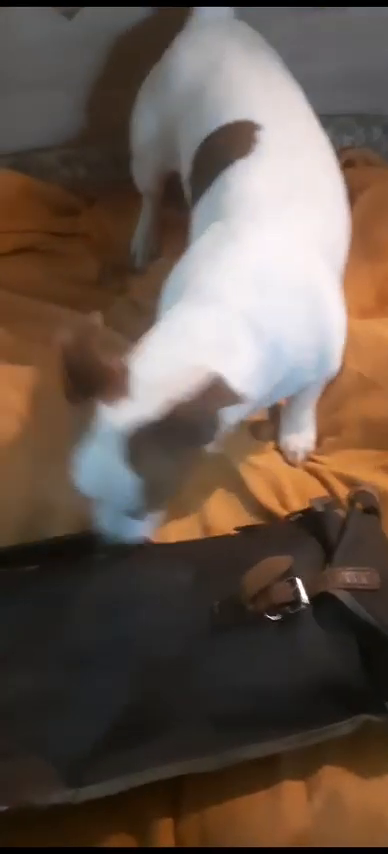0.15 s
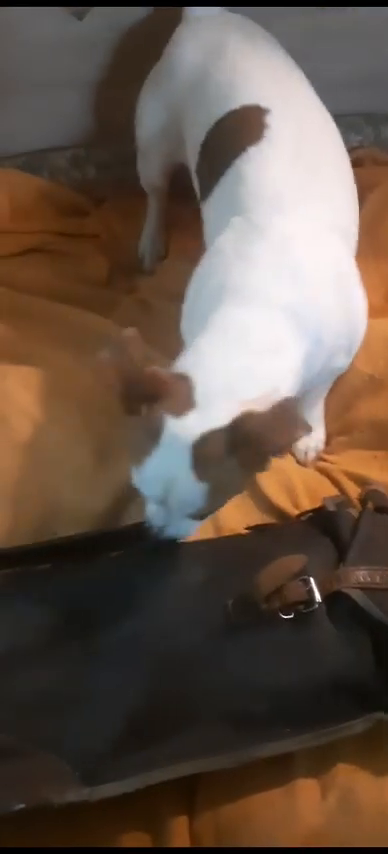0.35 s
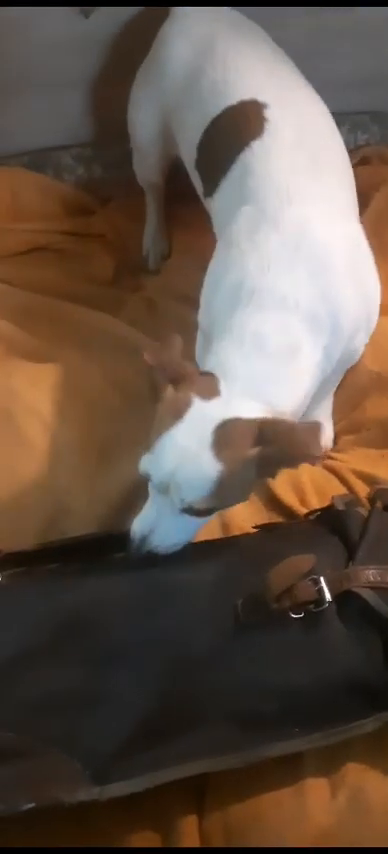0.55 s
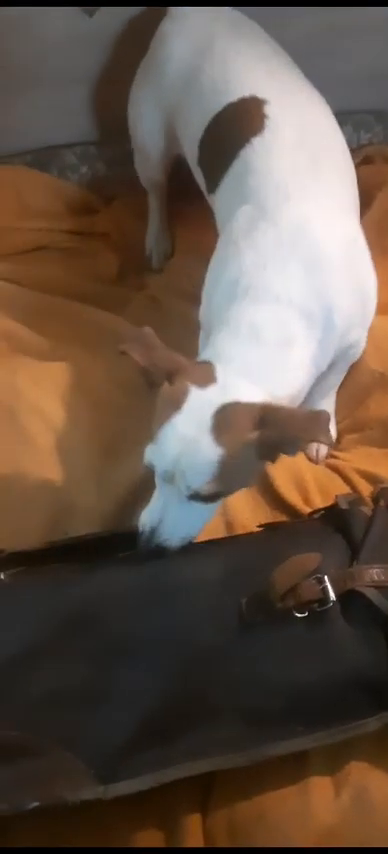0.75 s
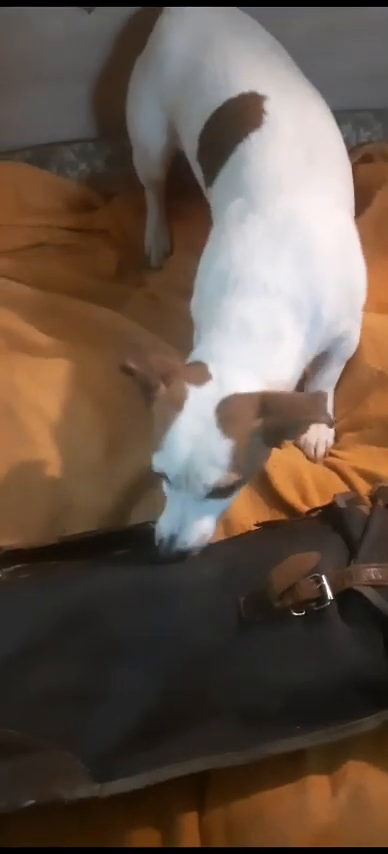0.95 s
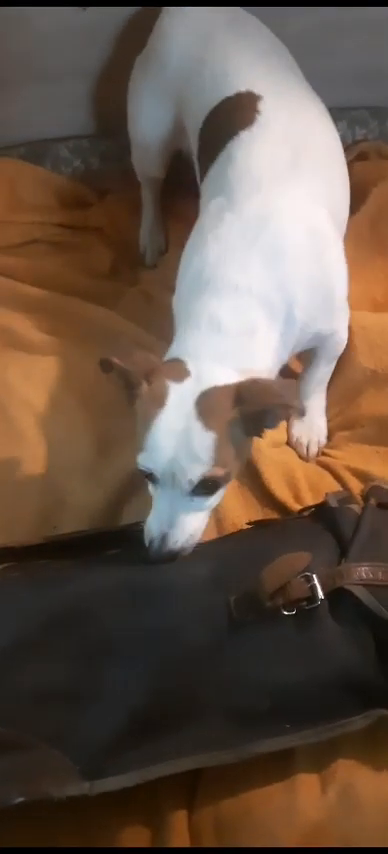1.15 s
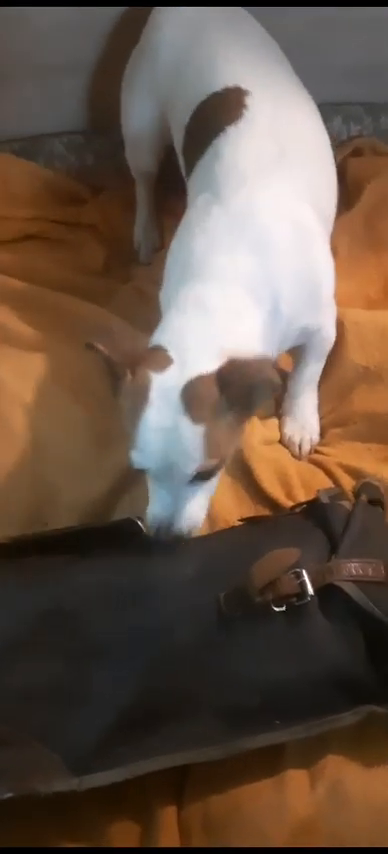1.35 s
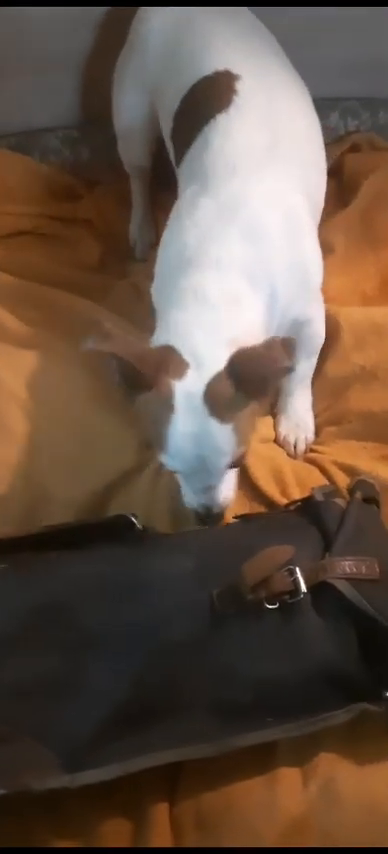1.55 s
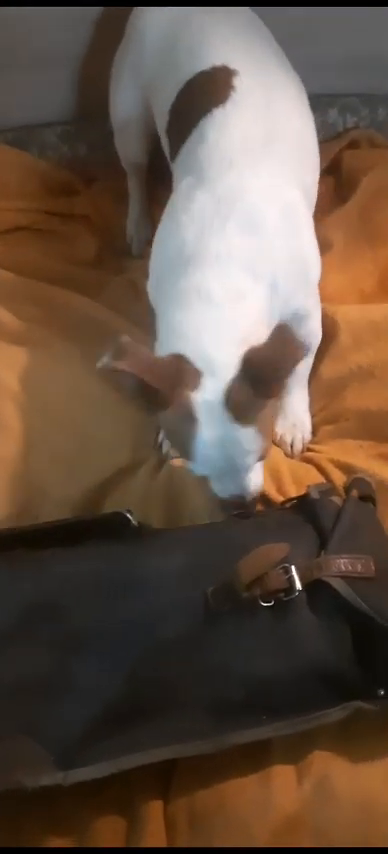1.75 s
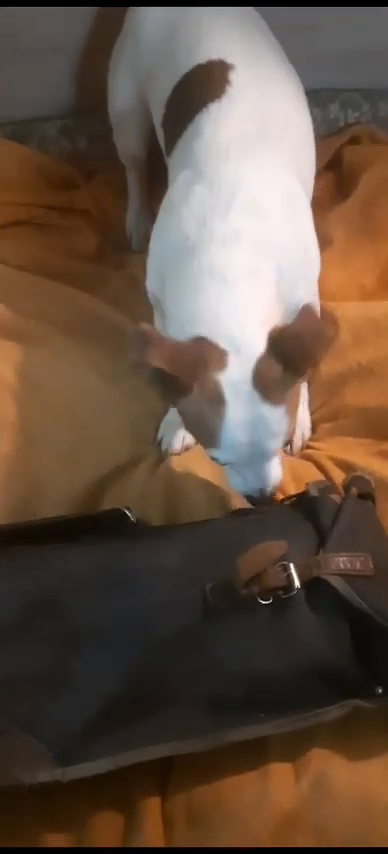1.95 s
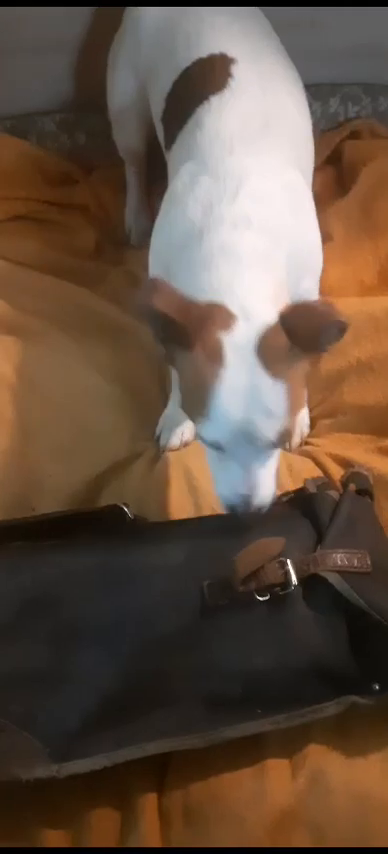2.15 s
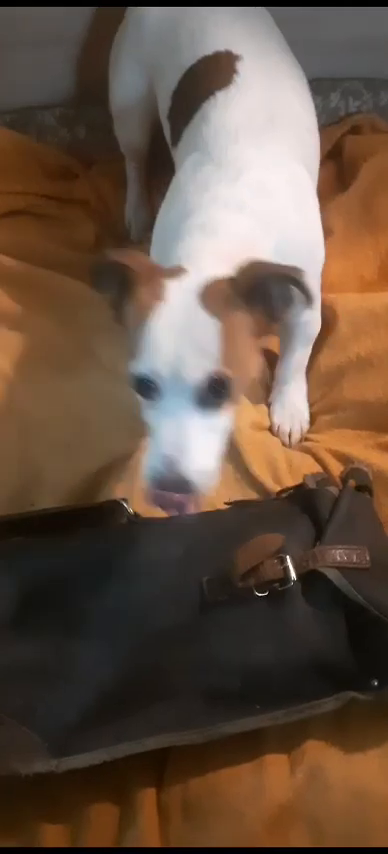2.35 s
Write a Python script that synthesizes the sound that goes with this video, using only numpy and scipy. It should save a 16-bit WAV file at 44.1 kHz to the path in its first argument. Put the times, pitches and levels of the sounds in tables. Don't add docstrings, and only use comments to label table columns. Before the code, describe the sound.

Dog whimpering close by, piercing whistle-like yips and falling whines, with breathy puffs and soft snorts

```python
import sys
import numpy as np
from scipy import signal
from scipy.fft import rfft, irfft, next_fast_len
from scipy.io import wavfile
from scipy.ndimage import uniform_filter1d, minimum_filter1d, map_coordinates

SR = 44100
rng = np.random.default_rng(int(sys.argv[2]) if len(sys.argv) > 2 else 0)


def to_wav(s):
    ch = np.atleast_2d(s).T
    pcm = np.round(np.clip(ch, -1, 1) * 32767)
    wavfile.write(sys.argv[1], SR, pcm.astype(np.int16))


def linear_from_db(decibels):
    return 10 ** (np.asarray(decibels, float) / 20)


N = 110250
T = np.arange(N) / SR
SHIMMER_DB, FLUTTER_DB = 0.5, 2.5
SMEAR_RAD = 0.08
AIR_FOLLOWS = 0.77


def unit(x):
    return x / np.sqrt(np.mean(x ** 2) + 1e-20)


def along(points, hz):
    f, v = np.transpose(points)
    return np.interp(np.log(hz + 1), np.log(f + 1), v)


def wobble(rate_hz):
    return map_coordinates(rng.standard_normal(int(N * 400 / SR) + 4), [T * rate_hz])


def filtered(x, response):
    m = next_fast_len(N + SR // 2)
    return irfft(rfft(x, m) * response(np.fft.rfftfreq(m, 1 / SR)), m)[..., :N]


def peak(f, hz, width_hz):
    return 1j * f * width_hz / (hz * hz - f * f + 1j * f * width_hz)


def track(rows):
    t_s, *cols = np.transpose(rows)
    gate = np.clip(np.minimum(T - t_s[0], t_s[-1] - T) / 0.004, 0, 1)
    return gate, [uniform_filter1d(np.interp(T, t_s, c), size=221) for c in cols]


def phase(hz):
    jitter = 0.003
    return 2 * np.pi * np.cumsum(hz * (1 + jitter * wobble(150))) / SR


def tone(angle, db, shimmer_db):
    return np.sqrt(2) * linear_from_db(db + shimmer_db * wobble(70)) * np.sin(angle)


def stack(hz, angle, db, start_db, fall_db, count, order):
    # f/Hz, gain/dB
    mouth = [(1500, -4.5), (2200, 0.5), (3200, 6), (5300, -4), (6600, -13.5), (8000, -1), (9900, -16.5),
             (11800, 1)]
    out = np.zeros(N)
    for k in range(order, count):
        smeared = k * angle + SMEAR_RAD * k * wobble(350)
        k_db = db + start_db + fall_db * (k - order) + along(mouth, k * hz) + FLUTTER_DB * wobble(320)
        out += tone(smeared, k_db, shimmer_db=3.5) * (k * hz < SR / 2)
    return out


def swell(start_s, rise_s, fall_s):
    u = T - start_s
    return np.clip(u / rise_s, 0, 1) ** 2 * np.exp(-3 * (np.clip(u - rise_s, 0, None) / fall_s) ** 1.5)


def background():
    # t/s, level/dB
    hum_rows = [(0, -77.5), (.3, -61), (.6, -72.5), (1.5, -77.5), (2.3, -63)]
    # f/Hz, gain/dB
    floor_curve = [(100, -19), (234, -11), (600, -11.5), (1200, -13.5), (2000, -29.5), (2700, -20.5),
                   (5000, -36.5), (15600, -36.5)]
    # f/Hz, start/s, length/s, level/dB
    far_rows = [(600, 0, 0.17, -70.5)]
    hum_hz, hum_width_hz, floor_db = 66.6, 110, -74.5
    a, b = rng.standard_normal((2, N))
    pair = np.array([a + 0.5 * b, a - 0.45 * b])
    hum_db, = track(hum_rows)[1]
    hum_angle = 2 * np.pi * np.cumsum(hum_hz + 2 * wobble(15)) / SR
    hum = tone(hum_angle, hum_db + 0.72 * wobble(8), 0)
    rumble = unit(filtered(pair, lambda f: peak(f, hum_hz, hum_width_hz) ** 2))
    hum = hum + linear_from_db(hum_db - 4) * rumble
    noise = rng.standard_normal((2, N)) + 2.4 * rng.standard_normal(N)
    hiss = unit(filtered(noise, lambda f: linear_from_db(along(floor_curve, f)) * (f > 100)))
    far = sum(tone(phase(hz + 0 * T), db, 1.38) * swell(s - 0.03, 0.04, length_s)
              for hz, s, length_s, db in far_rows)
    return hum + linear_from_db(floor_db + 0.88 * wobble(7.1)) * hiss + far


def thuds():
    # t/s, level/dB
    thud_rows = [
        (0, -70),
        (0.108, -66.5),
        (0.226, -49),
        (2.189, -56),
        (2.299, -56.5),
        (2.399, -62.5),
    ]
    push = unit(filtered(rng.standard_normal(N), lambda f: peak(f, 170, 460) ** 2))
    return push * sum(linear_from_db(db) * swell(s, 0.0175, 0.07) for s, db in thud_rows)


def patchy(x):
    streak_db = 4
    z = signal.stft(x, nperseg=256)[2]
    field = uniform_filter1d(rng.standard_normal(z.shape[1:]), size=2, axis=0)
    field = uniform_filter1d(field, size=14, axis=1)
    return signal.istft(z * linear_from_db(streak_db * unit(field)), nperseg=256)[1][:, :N]


def breath(level):
    # f/Hz, gain/dB
    air_curve = [(300, -35), (1100, -5), (2100, -8.5), (2850, 2.5), (5300, -6), (6300, -13.5), (8200, -13),
                 (15800, -47.5)]
    # f/Hz, gain/dB
    nostril_curve = [(2000, -35), (4500, -8.5), (6500, 3.5), (8300, 1.5), (10000, -18), (12500, -5),
                     (15500, -16)]
    # start/s, rise/s, fall/s, level/dB
    puff_rows = [
        (0.288, 0.012, 0.2, -63.5),
        (0.562, 0.033, 0.088, -46.5),
        (0.903, 0.036, 0.067, -46),
        (0.149, 0.021, 0.076, -57.5),
        (1.72, 0.064, 0.074, -52),
        (1.9, .03, .08, -68.5),
        (2.051, 0.051, 0.064, -41.5),
        (2.14, 0.11, 0.071, -61),
        (2.239, 0.099, 0.1, -50.5),
    ]
    # start/s, rise/s, fall/s, level/dB
    sniff_rows = [
        (.18, .05, .1, -68),
        (1.33, .05, .1, -62),
        (2.1, .06, .2, -59),
        (2.27, .08, .12, -56.5),
    ]
    air_db, apart = -32.5, 0.5

    def noise():
        mixed = rng.standard_normal(N) + apart * rng.standard_normal((2, N))
        return patchy(mixed) * linear_from_db(0.9 * wobble(200))

    air = unit(filtered(noise(), lambda f: linear_from_db(along(air_curve, f))))
    hiss = unit(filtered(noise(), lambda f: linear_from_db(along(nostril_curve, f))))
    bright = unit(air + 0.32 * np.gradient(air, axis=1))
    puffs = bright * sum(linear_from_db(db) * swell(s, r, f) for s, r, f, db in puff_rows)
    sniffs = hiss * sum(linear_from_db(db) * swell(s, r, f) for s, r, f, db in sniff_rows)
    return air * linear_from_db(air_db) * level + puffs + sniffs


def yips():
    # t/s, f/Hz, level/dB, octave/dB, twelfth/dB
    yip_a = [(0.184, 1905, -42, -83.5, -93), (0.2, 1805, -14, -29.5, -51.5), (0.24, 1940, -30.5, -57, -77)]
    yip_b = [(.407, 1400, -45.5, -51.5, -75.5), (.426, 1330, -28, -45, -71), (.434, 1450, -29, -32, -61.5),
             (.441, 1630, -12.5, -20.5, -57), (.45, 1720, -14, -20.5, -59.5), (.459, 1779, -8, -18.5, -51),
             (.469, 1860, -7, -25, -48.5), (.477, 1895, -14, -30.5, -50),
             (.483, 1927, -8, -22.5, -48), (.495, 1936, -6, -24.5, -43.5),
                  (.515, 1973, -10.5, -33, -48), (.532, 1982, -15, -42.5, -52),
                  (.55, 1937, -14.5, -58.5, -56), (.565, 1967, -25, -68.5, -67.5),
                  (.581, 1950, -38.5, -74, -76), (.585, 1900, -45.5, -83, -74)]
    yip_c_lead = [(0.753, 1500, -52, -81, -67), (0.779, 1227, -33.5, -73, -76),
                  (.802, 1243, -33.5, -72, -72), (0.81, 1363, -38.5, -75, -75)]
    yip_c = [(0.811, 1311, -50, -69.5, -74), (.822, 1370, -28.5, -67.5, -57),
             (0.846, 1398, -31, -29, -54.5), (0.883, 1609, -22, -33.5, -53),
             (.908, 1571, -27, -26.5, -50.5), (.926, 1233, -24.5, -45, -58),
             (0.946, 964, -34.5, -52, -65.5)]
    yip_d = [(1.689, 1877, -61.5, -77, -80.5), (1.699, 1800, -31, -57, -61),
             (1.711, 1691, -35.5, -49.5, -53.5), (1.727, 1790, -23.5, -56.5, -57.5),
             (1.744, 1938, -23, -60, -53.5), (1.77, 2016, -33, -52.5, -65.5),
             (1.785, 1986, -49, -64.5, -74), (1.812, 1996, -47.5, -70.5, -85)]
    yip_e = [(1.987, 1639, -40.5, -55, -83.5), (2.019, 1787, -12.5, -33.5, -34.5),
             (2.104, 1903, -25.5, -49.5, -70.5)]
    upper_steps = [-45.5, -40, -48, -38.5, -49, -45]
    # t/s, f/Hz, level/dB
    chirp_rows = [(1.515, 950, -55), (1.53, 1170, -44.5), (1.545, 1230, -67), (1.565, 1150, -80)]
    calls = (yip_a, yip_b, yip_c_lead, yip_c, yip_d, yip_e)
    out, level = np.zeros(N), np.zeros(N)
    for rows, upper_db in zip(calls, upper_steps):
        gate, (hz, db, octave_db, twelfth_db) = track(rows)
        a = phase(hz)
        call = tone(a, db, SHIMMER_DB)
        call += tone(2 * a, octave_db + 1.5 * wobble(250), 1.5)
        call += tone(3 * a + 3 * SMEAR_RAD * wobble(380), twelfth_db + FLUTTER_DB * wobble(260), 2)
        call += stack(hz, a, 0.7 * db, upper_db, fall_db=-3, count=9, order=4)
        out += gate * call
        level += uniform_filter1d(gate * linear_from_db(db * AIR_FOLLOWS), size=1103)
    gate, (hz, db) = track(chirp_rows)
    return out + gate * tone(phase(hz) + 0.93 * wobble(300), db, 2), level


def whines():
    # t/s, f/Hz, level/dB
    early = [
        [(.232, 967, -35), (.245, 973.5, -37), (.262, 945.3, -30.5), (.278, 949, -39), (.295, 824, -56)],
        [(.31, 810, -55), (.383, 830, -55), (.41, 719.3, -31), (.435, 687, -42.5)],
        [(.573, 853, -63.5), (.587, 900, -35.5), (.64, 894, -52), (.69, 814.4, -42), (.745, 769.6, -43),
         (.771, 714, -32), (.79, 678, -61.5)],
    ]
    late = [
        [(1.328, 930, -57), (1.37, 910, -42.5), (1.41, 870, -56.5), (1.446, 754, -41), (1.476, 735, -56.5)],
        [(1.821, 690, -78), (1.83, 715, -39), (1.872, 728, -45.5), (1.907, 750, -44.5), (1.925, 750, -68.5)],
        [(2.114, 740, -81.5), (2.127, 765, -35.5), (2.165, 762, -32.5), (2.19, 758, -35), (2.205, 748, -52)],
    ]
    sighs = [
        [(1.47, 535, -50.5), (1.485, 523, -54.5), (1.52, 470.8, -41), (1.55, 422, -78)],
        [(2.195, 600, -48.5), (2.215, 419.5, -44.5), (2.232, 474, -51)],
    ]
    falls = [-1.5, -11.5, -10.5, -9.5, -28, -16.5, -43, -15]
    out, level, fold, on = np.zeros((4, N))
    for rows, fall_db in zip(early + late + sighs, falls):
        gate, (hz, db) = track(rows)
        a = phase(hz)
        overtones = stack(hz, a, db, -10.5, fall_db, count=8, order=2)
        out += gate * (tone(a, db, SHIMMER_DB) + overtones)
        level += gate * linear_from_db(db * AIR_FOLLOWS)
        fold, on = np.where(gate > on, a, fold), np.maximum(gate, on)
    return out, level, fold, on


def rasps():
    # start/s, length/s, level/dB, throat f/Hz
    rasp_rows = [
        (0.238, 0.21, -48.5, 1390),
        (0.768, 0.056, -44.5, 1113),
        (0.943, 0.035, -40, 1065),
        (1.261, 0.027, -54, 616),
        (1.494, 0.11, -68, 1144),
        (2.199, 0.057, -42.5, 1080),
        (2.251, 0.11, -53.5, 1200),
        (2.301, 0.027, -42, 864),
        (2.319, 0.092, -48, 1100),
        (2.374, 0.092, -56, 843),
    ]
    rate_hz, width_hz, low_hz, low_db = 400, 470, 600, -5.5
    beats = np.diff(np.floor(np.cumsum(rate_hz * linear_from_db(4.9 * wobble(300))) / SR), prepend=0)
    beats = unit(beats * linear_from_db(1.3 * rng.standard_normal(N)) + 0.06 * rng.standard_normal(N))
    out = np.zeros(N)
    for s, length_s, db, hz in rasp_rows:
        def throat(f):
            pair = peak(f, hz, width_hz) - linear_from_db(low_db) * peak(f, low_hz, width_hz)
            return pair / (1 + 1j * f / 3000) ** 2
        out += linear_from_db(db) * unit(filtered(beats, throat)) * swell(s, 0.005, length_s)
    return out


def whistles(fold, on):
    # t/s, f/Hz, level/dB
    whistle_a = [(0.589, 4080, -49.5), (0.627, 4370, -44), (0.68, 4260, -49), (0.731, 4136, -42.5),
                 (0.763, 4150, -53.5)]
    whistle_b = [(1.347, 4050, -61.5), (1.365, 4170, -59), (1.385, 4150, -59.5), (1.41, 4230, -53.5),
                 (1.449, 4210, -72)]
    whistle_c = [(1.79, 4950, -51.5), (1.812, 4890, -56.5), (1.828, 4600, -60), (1.84, 4120, -54),
                 (1.86, 3960, -62), (1.915, 3860, -64), (1.93, 4000, -64), (1.95, 4090, -68.5)]
    whistle_d = [(2.115, 4650, -80), (2.132, 4350, -40.5), (2.148, 4050, -40), (2.17, 3914, -42.5),
                 (2.219, 3850, -56), (2.264, 3650, -66), (2.29, 3700, -85)]
    # lower sideband/dB, upper sideband/dB, octave/dB, octave gain/(dB/s)
    mix = [(1.5, -10.5, -17.5, -2), (0.5, 3.5, -13, 0), (-42.5, -10.5, -6.5, 11), (-3, -6.5, -7.5, 135.5)]
    second_db = -13
    out = np.zeros(N)
    for rows, mix_row in zip((whistle_a, whistle_b, whistle_c, whistle_d), mix):
        below_db, above_db, octave_db, gain_db_s = mix_row
        gate, (hz, db) = track(rows)
        a = phase(hz * (1 + 0.008 * wobble(33))) + 0.28 * wobble(350)
        octave_db = octave_db + gain_db_s * np.clip(T - rows[0][0], 0, rows[-1][0] - rows[0][0])
        sides = tone(a - 2 * fold, db + below_db + second_db, 4)
        sides += tone(a + 2 * fold, db + above_db + second_db, 4)
        sides += tone(a - fold, db + below_db, 3) + tone(a + fold, db + above_db, 3)
        sides += tone(2 * a - fold, db + octave_db - 15, 4) + tone(2 * a + fold, db + octave_db - 16, 4)
        octave = tone(2 * a, db + octave_db, 2.5) * np.clip((4750 - hz) / 100, 0, 1)
        out += gate * (tone(a, db, 4) + octave + on * sides)
    return out


def room(x):
    # f/Hz, T60/s
    t60 = [(300, 0.45), (8000, 0.019)]
    hz, t, z = signal.stft(rng.standard_normal((2, SR // 2)), SR, nperseg=256)
    decay = linear_from_db(-60 * t / along(t60, hz)[:, None])
    tail = signal.istft(z * decay, SR, nperseg=256)[1]
    late = np.pad(x, (200, 0))[None]
    return signal.fftconvolve(late, tail / np.linalg.norm(tail[0]), axes=1)[:, :N]


def scene():
    # f/Hz, first over second/dB
    pan = [(300, 2.5), (740, -13), (930, -4.5), (1450, -10), (1800, 4.5), (1970, -4.5), (3500, -2),
           (12000, 4.5)]
    lead_rad, room_db = 1.551, -28
    high, high_level = yips()
    low, low_level, fold, on = whines()
    dog = high + low + whistles(fold, on) + breath(high_level + 1.2 * low_level) + rasps()
    side = np.array([[1], [-1]])

    def to_ports(f):
        return linear_from_db(side * along(pan, f) / 2) * np.exp(0.5j * lead_rad * np.tanh(f / 2500) * side)

    return filtered(dog, to_ports) + linear_from_db(room_db) * room(dog[0]) + thuds() + background()


def band_limit(x):
    return signal.sosfilt(signal.butter(12, 15800, fs=SR, output="sos"), x)


def record(dry):
    need = np.minimum(1, 0.93 / (np.abs(dry).max(axis=0) + 1e-9))
    gain = uniform_filter1d(minimum_filter1d(need, size=883), size=441)
    return band_limit(dry * gain)


dry = scene()
out = record(dry)
to_wav(out)
```